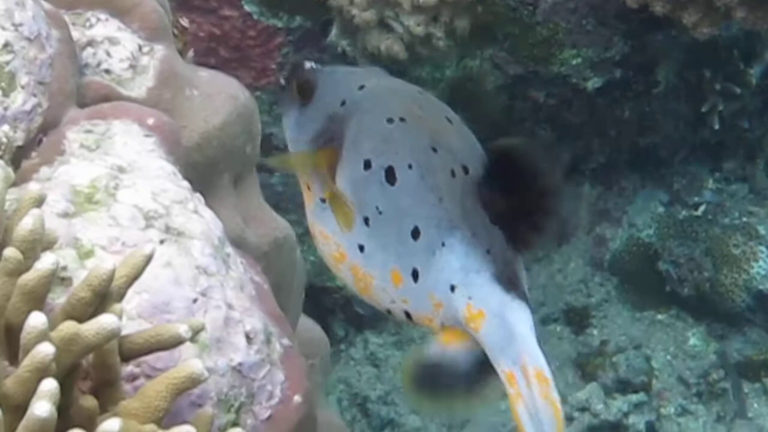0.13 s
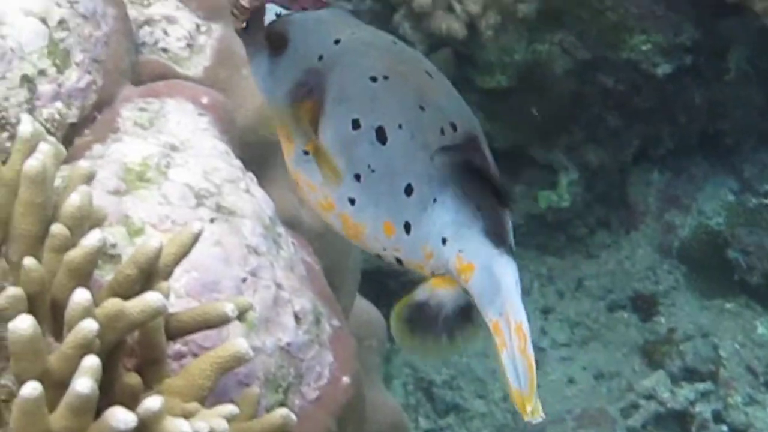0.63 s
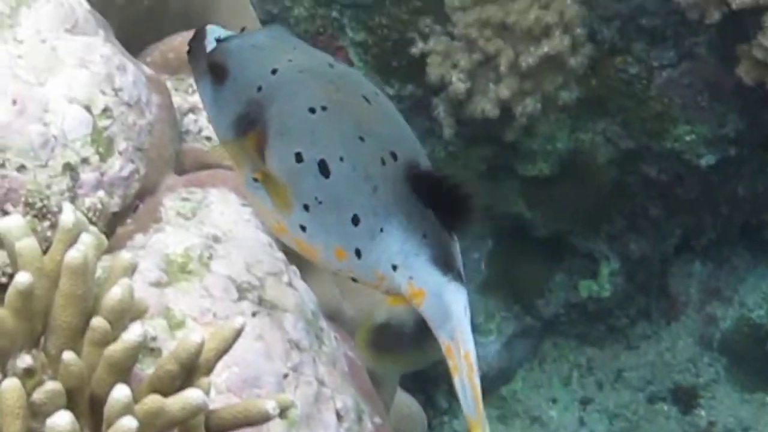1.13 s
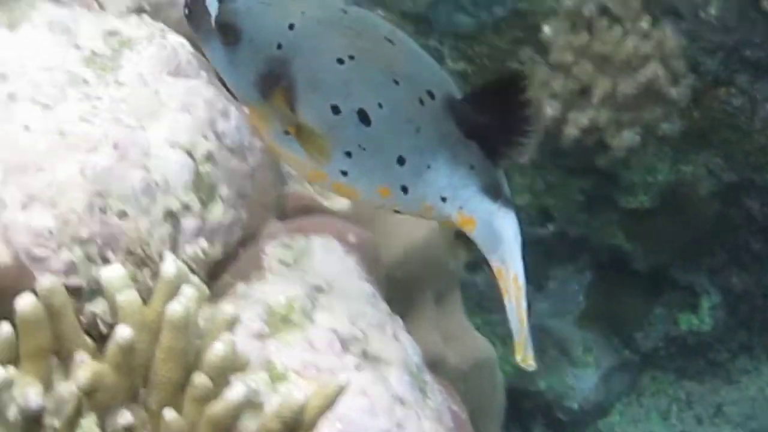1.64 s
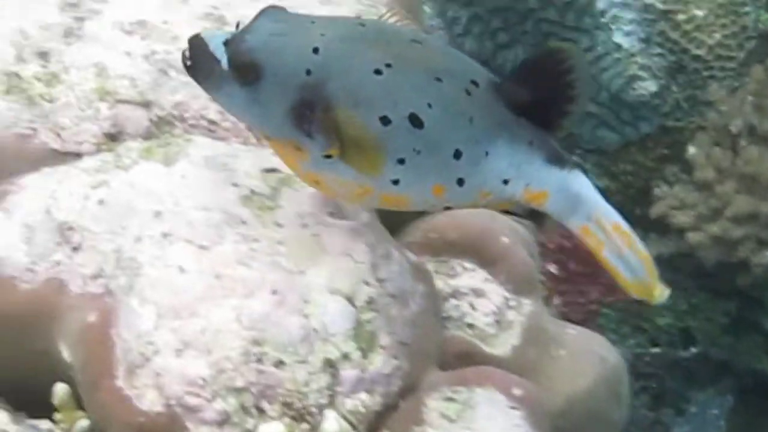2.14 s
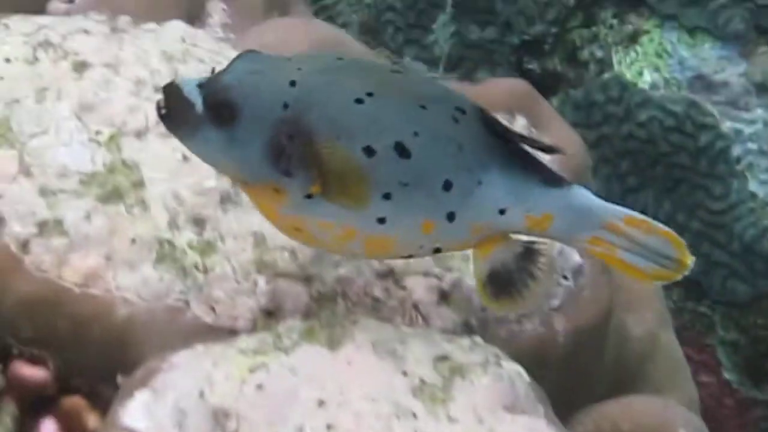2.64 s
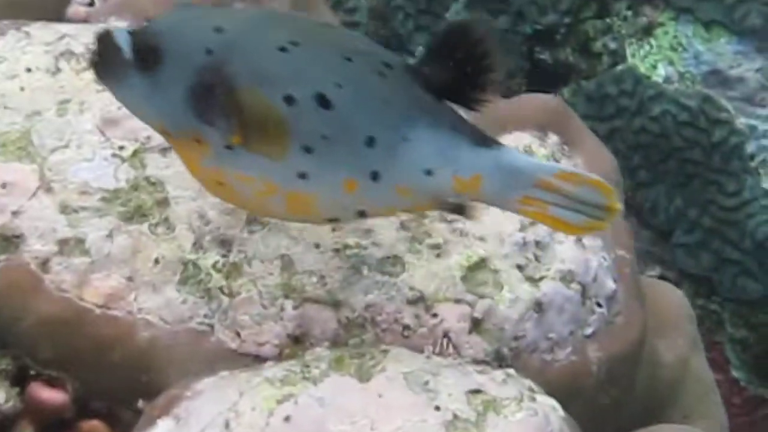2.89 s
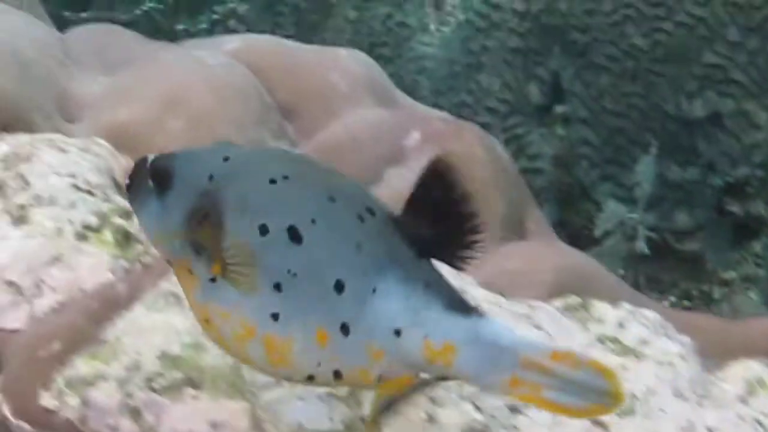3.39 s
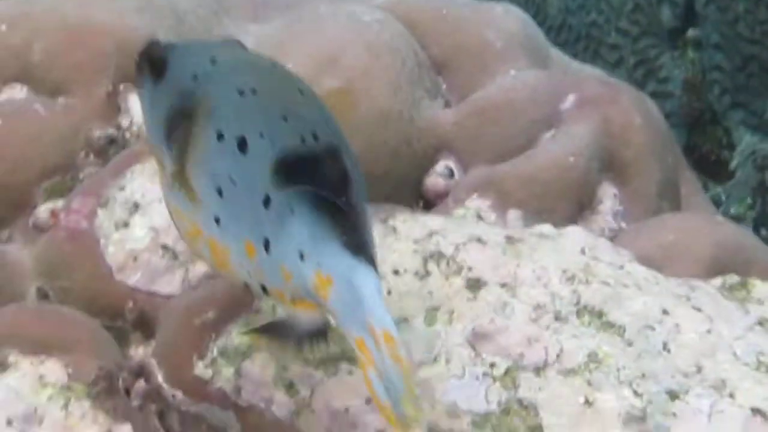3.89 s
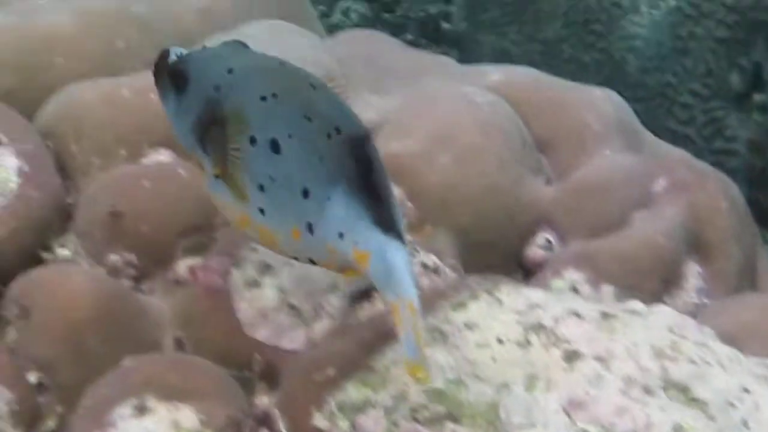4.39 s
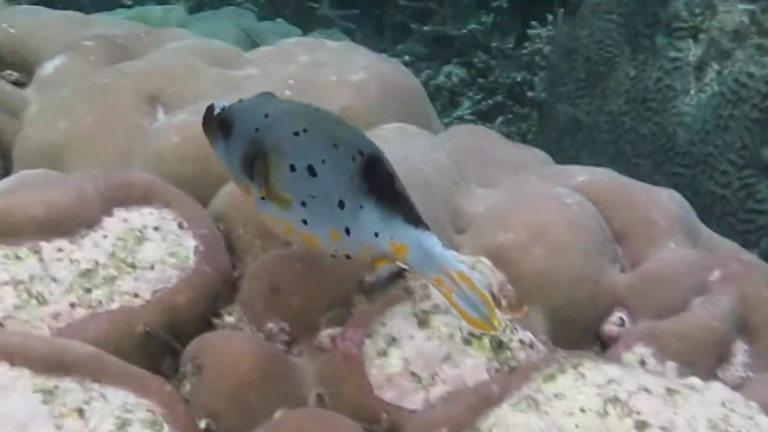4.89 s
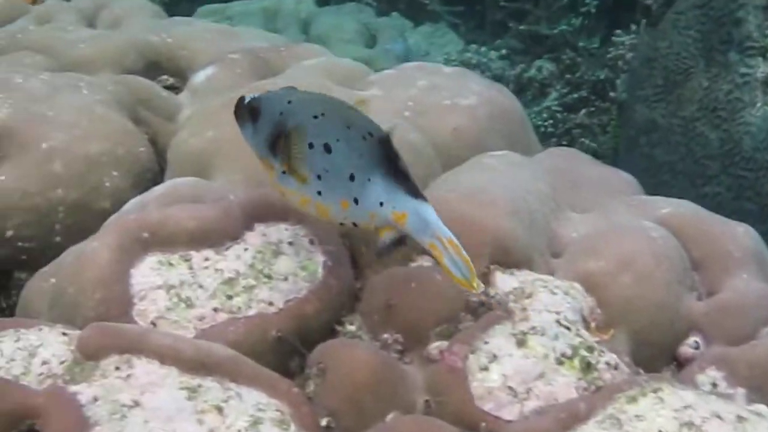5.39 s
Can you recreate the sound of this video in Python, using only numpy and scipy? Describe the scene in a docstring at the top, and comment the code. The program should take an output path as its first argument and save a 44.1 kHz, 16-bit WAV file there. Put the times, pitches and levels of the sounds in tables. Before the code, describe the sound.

Snapping shrimp tick and crackle constantly inside a muffled low hum, while a hand bumps and briefly creaks against a sealed plastic case.

```python
"""A camera in a sealed plastic housing drifts over a coral reef. Throughout, distant snapping shrimp crackle,
moving water hums in the shell, the electronics whine faintly and nearer shrimp click. The diver's grip soon
knocks, later also rubs and creaks by stick-slip friction, and jerks of the housing add slow pushes. Shrimp,
water and grip are forces driving one set of resonant modes, heard unequally by two microphones inside;
jerks and whine bypass the modes. Gain control ducks after the hardest knocks."""
import sys
import numpy as np
from scipy import signal
from scipy.fft import rfft, irfft
from scipy.io import wavfile
from scipy.ndimage import uniform_filter1d, map_coordinates

SR = 44100
rng = np.random.default_rng(int(sys.argv[2]) if len(sys.argv) > 2 else 0)


def wrap_up_sound(samples):
    """Save the sound to the file named by the first command line argument, as 16-bit audio."""
    columns = np.atleast_2d(samples).T
    # keep every value between -1 and 1, then stretch to whole-number steps
    tamed = np.clip(columns, -1, 1)
    steps = np.round(tamed * 32767).astype(np.int16)
    wavfile.write(sys.argv[1], SR, steps)


def volts_from_db(level):
    """Convert decibel levels to linear amplitude ratios."""
    exponent = np.asarray(level, float) / 20
    return 10 ** exponent


N = 243431

# force spectrum of a shrimp snap: (frequency [Hz], relative power density [dB])
SNAP_DRIVE = [(800, -13), (2000, -2.5), (4000, -0.5), (6000, 0), (9000, -3.5), (16000, 4)]


def unit(x):
    """Normalization: scale a signal to rms 1."""
    return x / np.sqrt(np.mean(x ** 2) + 1e-20)


def colour(points, hz):
    """Minimum phase: a folded cepstrum gives the causal response with the gain of (Hz, dB) points."""
    point_hz, point_db = np.transpose(points)
    gain_db = np.interp(np.log(hz + 1), np.log(point_hz), point_db)
    cepstrum = irfft(np.log(volts_from_db(gain_db)))
    half = len(cepstrum) // 2
    cepstrum[1:half] *= 2
    cepstrum[half + 1:] = 0
    return np.exp(rfft(cepstrum))


def filtered(x, response):
    """Linear filtering: convolve with an impulse response scaled to pass unit noise power."""
    pulse = np.atleast_2d(irfft(response(np.fft.rfftfreq(16384, 1 / SR))))
    pulse = pulse / np.sqrt(np.sum(pulse ** 2) / len(pulse))  # mean over the channels
    return signal.oaconvolve(x, pulse, axes=1)[:, :N]


def through_shell(force, drive):
    """Modal superposition: a coloured force excites damped resonances, weighted for each microphone."""
    # resonances of shell and trapped air: (centre [Hz], bandwidth [Hz], relative left gain [dB],
    # relative right gain [dB], signed right weight [factor])
    housing = [(171.7, 23.6, -8, -3.5, 0.81), (257, 72.6, -9.5, -4.5, 0.8), (347.7, 38.1, 4, 3, 0.99),
               (587.4, 64, -5.5, -4, 0.8), (820, 97, -14, -0.5, 0.42), (1010, 123, -8.5, -22.5, 0.65),
               (1250, 220, -8.5, -3.5, 0.098), (1680, 135, -13.5, -7.5, 0.47),
               (2680, 1030, -8, -8.5, -0.14), (2860, 120, -13, 1, -1), (3600, 400, -9, -7, 1),
               (4030, 300, -7, -8, 1), (4320, 260, -11, -4, -1), (4980, 220, -1, -4, -1),
               (5550, 350, -3, -8, 1), (5800, 200, -5, -8, 1), (6300, 500, -8, -5, -1),
               (6750, 400, -17, -3, 1), (7150, 300, -21, -7, -1), (7550, 880, -15, -33, -1.3),
               (8680, 1700, -29, -10.5, 0.88), (10730, 1100, -21.5, -21, -1.2),
               (12300, 3400, -41, -29, -1.4)]

    def response(hz):
        total = 0
        for k, (centre, width, left_db, right_db, right_weight) in enumerate(housing):
            gains = volts_from_db([[left_db], [right_db]]) * [[1], [right_weight]]
            damping = 1j * hz * width
            mode = gains * damping / (centre ** 2 - hz ** 2 + damping)
            total = total + (-1) ** k * mode  # successive modes alternate in sign
        return total * colour(drive, hz)
    return filtered(force, response)


def pair(size, alike):
    """Partial coherence: two noises of rms 1 share the fraction alike of their power."""
    shared, left, right = rng.standard_normal((3, size))
    alike = np.clip(alike, 0, 1)
    return np.sqrt(alike) * shared + np.sqrt(1 - alike) * np.array([left, right])


def wobble(rate):
    """Slow random modulation: a smooth curve through rate random knots a second."""
    knots = rng.standard_normal(int(N * rate / SR) + 4)
    return map_coordinates(knots, [np.arange(N) * rate / SR])


def add(track, s, sound):
    """Superposition: mix a stereo sound into a track at s seconds."""
    track[:, round(s * SR):][:, :sound.shape[1]] += sound


def tuned(burst, centre_hz, width, floor):
    """Resonance: favour one pitch (width as a share of it) over a flat floor, at a set energy."""
    hz = np.fft.rfftfreq(4096, 1 / SR)
    band = 1j * hz * width * centre_hz
    resonance = band / (centre_hz ** 2 - hz ** 2 + band)
    shaped = irfft(rfft(burst, 4096) * (floor + resonance))[:, :burst.shape[1]]
    return 9 * shaped / np.linalg.norm(shaped)


def far_shrimp():
    """Shot noise: hundreds of random snaps a second, mostly faint, a few standing out, over a noise bed."""
    when, side, size = rng.random((3, 2200))
    size_db = np.minimum(-4.5 * np.log(size), 19)  # exponential spread of levels, with a ceiling
    at = (when * N).astype(int)
    strikes = [np.bincount(at, volts_from_db(size_db + sign * 4.6 * (side - 0.5)), N) for sign in (1, -1)]
    decay = volts_from_db(-60 * np.arange(800) / SR / 0.01)  # 60 dB in 10 ms
    envelope = signal.fftconvolve(strikes, decay[None], axes=1)[:, :N]
    crackle = unit(envelope * pair(N, alike=0.08))
    bed = pair(N, alike=0.35)
    return volts_from_db(-60) * through_shell(crackle, SNAP_DRIVE) + volts_from_db(-68) * through_shell(bed, SNAP_DRIVE)


def water():
    """Forced vibration: moving water pushes unevenly on the shell and wakes its low modes."""
    # level of the hum: (time [s], level [dB])
    flow = [(0.0, -54.5), (1.43, -51.5), (2.37, -54.5), (2.89, -51.5), (3.2, -55), (3.29, -50.5),
            (3.53, -51.5), (3.71, -52), (3.97, -55), (4.12, -54.5), (5.21, -51.5), (5.52, -53.5)]
    # force spectrum of the water: (frequency [Hz], relative power density [dB])
    swell = [(25, -39), (100, 4.5), (300, -5), (1000, 0), (2000, -18), (4000, -42.5)]
    s, db = np.transpose(flow)
    push = unit(volts_from_db(1.8 * wobble(30)) * pair(N, alike=0.94))
    level_db = np.interp(np.arange(N) / SR, s, db)
    return volts_from_db(level_db) * through_shell(push, swell)


def whine():
    """Frequency modulation: the electronics' faint high tone wavers, mostly at the right microphone."""
    tone_hz = 8800 + 8 * wobble(40)
    tone = np.sin(2 * np.pi * np.cumsum(tone_hz) / SR)
    return volts_from_db([[-88], [-76]]) * tone


def near_shrimp():
    """Cavitation: collapsing bubbles give sharp bursts with coral echoes as decaying noise; one is a clack."""
    # the loudest nearby snaps, and at 3.7384 s the clack of a knock on the housing:
    # (time [s], relative level [dB], left over right before a common tilt [dB], resonance centre [Hz])
    bursts = [(0.2828, -34, 10, 6040), (0.4423, -35.5, 2, 5700), (0.6268, -41.5, -7, 6740),
              (0.6966, -39.5, 12, 5770), (0.7841, -35.5, 11, 3730), (0.8744, -33.5, 6, 7010),
              (1.0236, -39.5, 10, 5700), (1.1113, -22, 6, 5440), (1.263, -36.5, 0, 5900),
              (1.4042, -38, 6, 4330), (1.5199, -29, 0, 4530), (1.5275, -32, -2, 6700),
              (1.5597, -33.5, 4, 6700), (1.5856, -36, 0, 6260), (1.7564, -39.5, 5, 5900),
              (1.804, -39, 1, 6730), (1.838, -32.5, 7, 5100), (1.8803, -29.5, 3.5, 5940),
              (1.9067, -38, 0, 4930), (2.0108, -35.5, 5, 6300), (2.164, -34.5, 5, 6300),
              (2.2314, -39, 9, 5300), (2.2805, -33, 1, 6560), (2.4067, -40, -2, 6030),
              (2.4718, -37.5, 5, 6230), (2.644, -35, -1, 6400), (2.9367, -44, 0, 6330),
              (3.1477, -34, 5, 5750), (3.1911, -30.5, 7, 8800), (3.3247, -37, -3, 6210),
              (3.2226, -42, -4, 5810), (3.335, -23.5, 4.5, 7000), (3.35, -43, -4, 5850),
              (3.481, -40, 1, 6600), (3.7384, -33, 6, 2650), (3.8468, -39.5, 0, 5950),
              (3.8723, -31.5, 0, 6000), (4.0978, -33.5, 8, 5700), (4.1797, -30.5, 0, 6540),
              (4.272, -38, -2, 6680), (4.406, -27, 4, 6500), (4.4782, -38, 2, 4670),
              (4.6044, -31, -0.5, 5500), (4.7554, -22, 2.5, 6260), (4.8399, -38, 4, 5650),
              (4.863, -31.5, 3, 6290), (5.0988, -41.5, -4, 5900), (5.37, -33.5, 3, 6680)]
    # fainter snaps at random moments: mean and scatter of level, side and centre
    faint_db, faint_scatter_db, faint_pan_db = -46, 2.5, 4
    faint_hz, faint_scatter_oct = 5700, 0.2
    when = rng.random(size=30) * N / SR
    size, side, pitch = rng.standard_normal(size=(30, 3)).T
    faint = zip(when, faint_db + faint_scatter_db * size, faint_pan_db * side,
                faint_hz * 2 ** (faint_scatter_oct * pitch))

    track, t = np.zeros((2, N + SR)), np.arange(1024) / SR
    envelope = (1 - np.exp(-t / 0.00016)) * volts_from_db(-60 * t / 0.017)  # falls 60 dB in 17 ms
    for s, db, pan_db, centre_hz in [*bursts, *faint]:
        burst = tuned(pair(len(t), alike=0.27) * envelope, centre_hz, width=0.37, floor=0.41)
        pan = volts_from_db([[pan_db / 2 - 6.0], [-pan_db / 2 - 0.5]])  # the common tilt favours the right
        add(track, s, volts_from_db(db - 2.5) * pan * burst)
    return through_shell(track[:, :N], SNAP_DRIVE)


def knocks():
    """Impact excitation: a short contact gives a bright crack, a clack coloured by its place and a low thud."""
    # blows and slips on the shell: (time [s], relative crack level [dB], relative clack level [dB],
    # clack resonance centre [Hz], relative thud level [dB])
    blows = [(0.1895, -48, -53, 1720, -65), (1.0313, -49, -49.5, 970, -47), (1.1109, -24, -43.5, 1810, -48),
             (1.1378, -57, -44.5, 786, -36.5), (1.4821, -43, -50.5, 820, -39),
             (1.5117, -61, -42, 905, -35.5), (1.98, -42, -44, 2920, -44.5), (2.5104, -39, -44.5, 2880, -61),
             (2.9673, -37, -46.5, 1770, -32.5), (2.9825, -29.5, -34, 1150, -20),
             (2.9865, -21, -31.5, 1130, -18.5), (2.9958, -25, -29, 1230, -21), (3.016, -27, -41, 1750, -25),
             (3.0497, -19.5, -35.5, 1610, -34), (3.2072, -47, -60, 778, -41.5),
             (3.2587, -19.5, -20, 2630, -14.5), (3.27, -40, -30, 745, -25), (3.2759, -35, -31, 1600, -22),
             (3.2956, -53, -43.5, 2830, -33), (3.316, -53, -45.5, 1680, -58), (3.5564, -34, -53, 1250, -67),
             (3.562, -34, -35, 3980, -58), (3.5668, -35, -23, 1900, -65), (3.577, -21, -34.5, 835, -36.5),
             (3.6743, 3, -13.5, 1550, -27), (3.7356, -34, -39.5, 743, -74), (3.915, -34.5, -54, 861, -41.5),
             (3.9948, -61, -48.5, 950, -41), (4.0186, -30, -45, 2380, -69),
             (4.0284, -25.5, -32.5, 1630, -50), (4.0493, -25.5, -39.5, 2830, -70),
             (4.0621, -34, -46, 1780, -62), (4.0911, -56, -61, 1660, -43), (4.1511, -41, -60, 859, -40),
             (4.2172, -49, -28, 790, -27), (4.226, -40, -29, 640, -34), (4.406, -43, -53, 2850, -43),
             (4.8272, -49, -46.5, 1200, -39.5), (4.9889, 0.5, -12.5, 3430, -16.5),
             (5.064, -46, -48, 1600, -46)]
    # force spectra of the three parts: (frequency [Hz], relative power density [dB])
    thud_drive = [(40, -17), (200, 1), (450, -2), (700, -13.5), (1500, -32)]
    clack_drive = [(250, -11), (500, -1.5), (1700, 10), (3700, -11), (5000, -10.5), (9000, -29)]
    crack_drive = [(1500, -101), (3500, 5), (6000, 0.5), (8000, -2), (10500, 3), (13000, -4), (16000, -12)]
    grip_pan_db = -4  # the hand holds the right side
    pan = volts_from_db([[grip_pan_db / 2], [-grip_pan_db / 2]])
    thud, clack, crack = np.zeros((3, 2, N + SR))
    t = np.arange(1024) / SR
    for s, crack_db, clack_db, centre_hz, thud_db in blows:
        hardness = volts_from_db(0.5 * crack_db)  # harder blows spread over more modes
        tick = np.exp(-t / 0.00091) * pair(len(t), alike=0.23)
        tick = tuned(tick, 5100, width=0.46, floor=hardness)
        add(crack, s, volts_from_db(crack_db - 10) * pan * tick)
        contact = np.exp(-t / 0.0027) * pair(len(t), alike=0.49)
        contact = tuned(contact, centre_hz, width=0.28, floor=np.minimum(0.1 + 1.6 * hardness, 0.6))
        add(clack, s, volts_from_db(clack_db + 6) * pan * contact)
        push = volts_from_db(thud_db + 22.5) * np.ones((2, 1))  # one sample must carry the whole push
        add(thud, s + 0.0025, push)
    parts = ((thud, thud_drive), (clack, clack_drive), (crack, crack_drive))
    return sum(through_shell(track[:, :N], drive) for track, drive in parts)


def rubbing():
    """Stick-slip friction: an uneven force swells, holds and fades, driving low to high modes together."""
    # a hand sliding on the shell: (start [s], length [s], relative groan level [dB],
    # relative hollow level [dB], relative scrape level [dB])
    rubs = [(1.461, .085, -45.5, -52, -57), (3.002, 0.077, -28, -37.5, -40.5),
            (3.099, 0.067, -36.5, -49.5, -48.5), (4.19, 0.065, -41, -31.5, -39),
            (4.9645, .011, -25, -36.5, -34), (4.978, .011, -20.5, -40, -28.5)]
    # force spectra from low to high: (frequency [Hz], relative power density [dB])
    groan = [(100, -8.5), (280, -8), (350, 1), (430, -12.5), (700, -12), (1500, -48)]
    hollow = [(250, -23), (500, 6), (1100, 10.5), (1500, 0), (3000, -58)]
    scrape = [(700, -81), (1400, 11.5), (3000, -8), (4200, -51), (8000, -36)]
    rasp = [(1500, -57), (3500, 1), (6500, 6.5), (8000, -1), (11000, -4), (16000, -14)]
    rise, fall, ends_db = 0.22, 0.43, 11.5  # shares of a stroke spent swelling and fading; depth of both
    rasp_db, quick_db = -2.5, 2.5  # rasp over scrape in a 0.1 s stroke; its gain per halved length
    tracks = np.zeros((4, 2, N + SR))
    slips = unit(volts_from_db(2 * wobble(300)))
    for s, length, groan_db, hollow_db, scrape_db in rubs:
        u = np.arange(round(length * SR)) / (length * SR)  # progress of the stroke, 0 to 1
        shape_db = -ends_db * np.maximum(np.maximum(1 - u / rise, 1 - (1 - u) / fall), 0)
        force = volts_from_db(shape_db) * slips[round(s * SR):][:len(u)]
        high_db = scrape_db + rasp_db - quick_db * np.log2(10 * length)
        for track, db in zip(tracks, (groan_db, hollow_db, scrape_db, high_db)):
            add(track, s, volts_from_db(db) * force * pair(len(u), alike=0.48))
    parts = zip(tracks, (groan, hollow, scrape, rasp))
    return sum(through_shell(track[:, :N], drive) for track, drive in parts)


def jolts():
    """Transient acceleration: a jerk of the housing is one slow push and rebound on both microphones."""
    # jerks of the whole housing: (time [s], relative level [dB])
    jerks = [(2.847, -64), (2.99, -44), (3.26, -49.5), (3.368, -61), (3.566, -45), (3.672, -52),
             (4.118, -61), (4.222, -54), (4.972, -44), (4.99, -41)]
    track = np.zeros((2, N + SR))
    u = np.arange(3000) / SR / 0.0017  # time in units of 1.7 ms
    pulse = u * (2 - u) * np.exp(-u)
    for s, db in jerks:
        add(track, s, volts_from_db(db + 22.5) * volts_from_db([[-1.5], [1.5]]) * pulse)
    return track[:, :N]


def scene():
    """Superposition: the forces on the housing and the whine add at the microphones."""
    return far_shrimp() + water() + whine() + near_shrimp() + knocks() + rubbing() + jolts()


def gain_control(x):
    """Dynamic compression: gain drops at loud peaks and creeps back at a steady rate."""
    power = uniform_filter1d(np.max(x ** 2, 0), 220, origin=100)  # 5 ms window, mostly looking back
    loud_db = 10 * np.log10(abs(power) + 1e-12)
    over_db = 0.65 * np.maximum(loud_db + 14.5, 0)
    recover_db = 14 * np.arange(N) / SR  # 14 dB a second
    duck_db = np.maximum.accumulate(over_db + recover_db) - recover_db
    return x * volts_from_db(-uniform_filter1d(duck_db, 200, origin=99))


def top_cut(x):
    """Nothing passes above the cut-off."""
    return signal.sosfilt(signal.butter(12, 16460, fs=SR, output="sos"), x)


def record(dry):
    """Signal chain: microphone noise, band limit, gain control and a saturating soft ceiling."""
    # spectrum of the microphone noise: (frequency [Hz], relative power density [dB])
    hiss = [(25, 3), (100, -0.5), (1000, -8), (3000, -12), (8000, -18), (16000, -29.5)]
    noise = filtered(rng.standard_normal((2, N)), lambda hz: colour(hiss, hz))
    x = dry + volts_from_db(-52.0) * noise
    low_pass = signal.cheby2(16, 30, 15900, fs=SR, output="sos")  # stopband from 15900 Hz
    x = gain_control(signal.sosfiltfilt(low_pass, x))
    mix = x / (1 + abs(x / 1.05) ** 8) ** (1 / 8)  # peaks approach 1.05
    return top_cut(mix)


dry = scene()
out = record(dry)
wrap_up_sound(out)
```